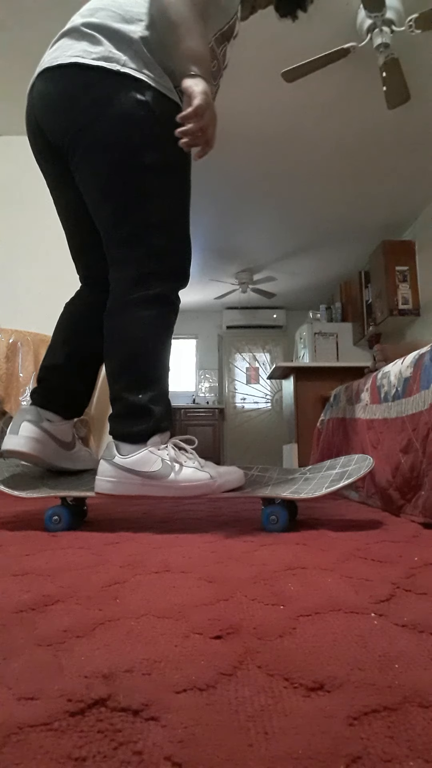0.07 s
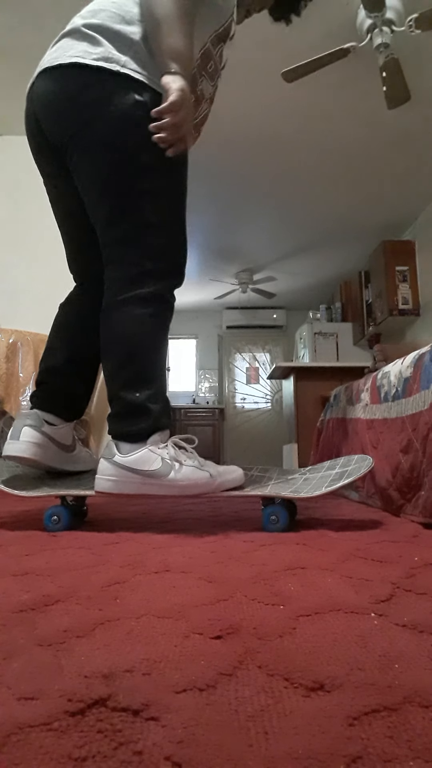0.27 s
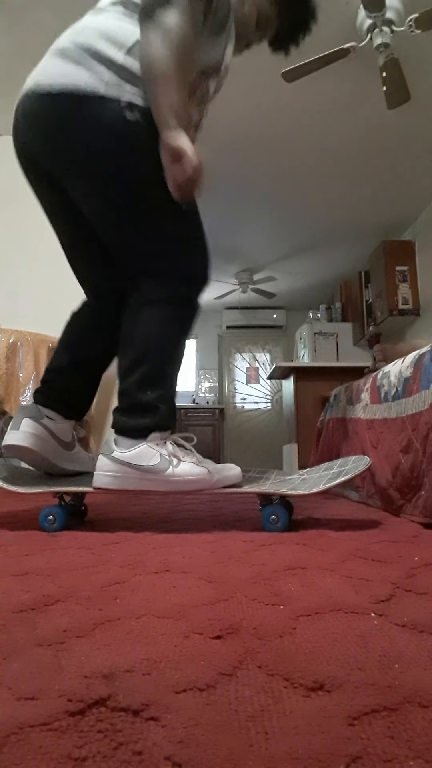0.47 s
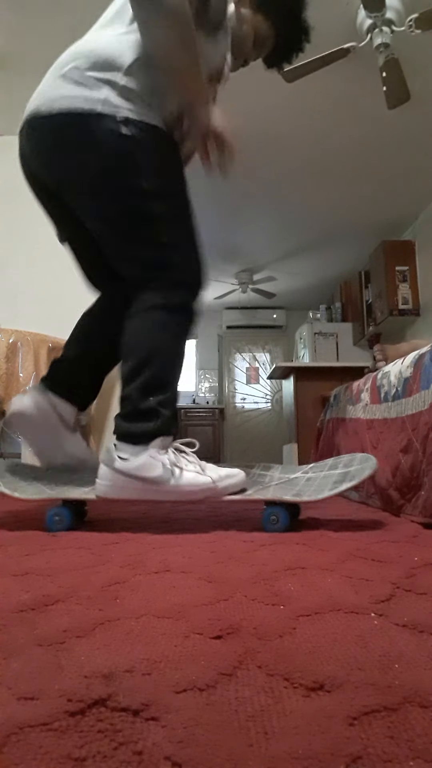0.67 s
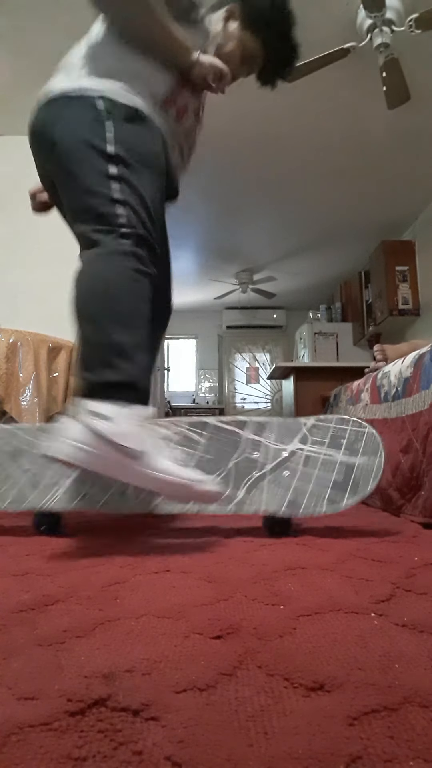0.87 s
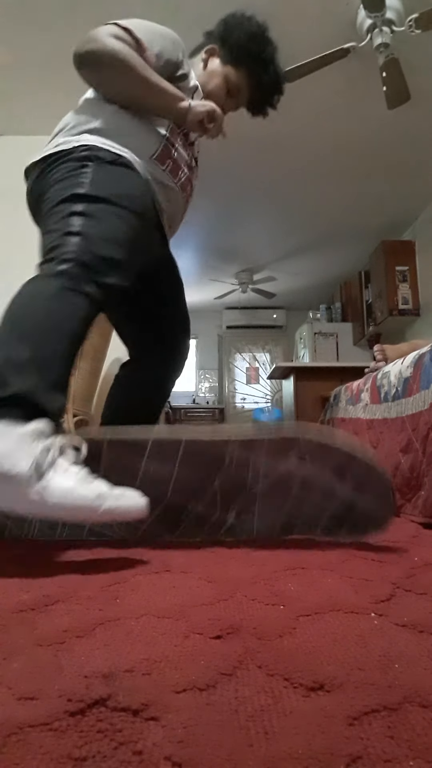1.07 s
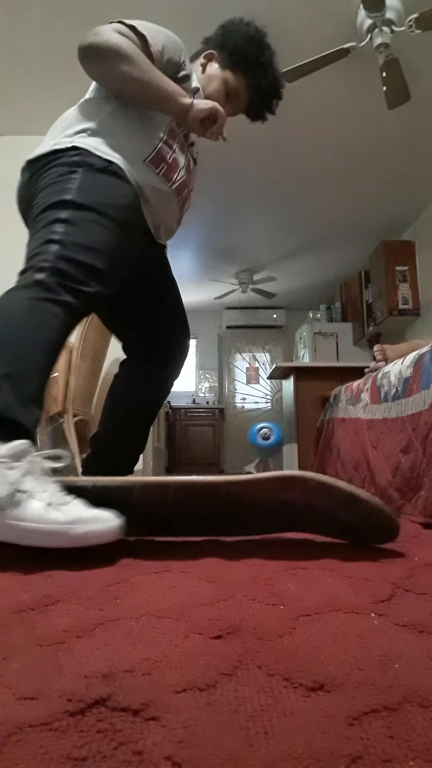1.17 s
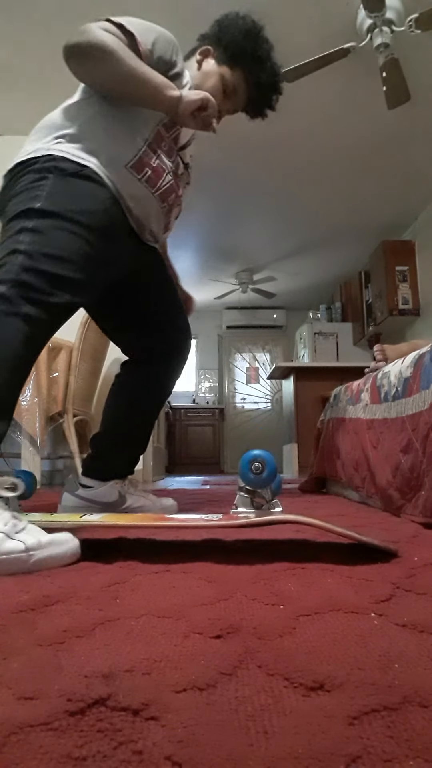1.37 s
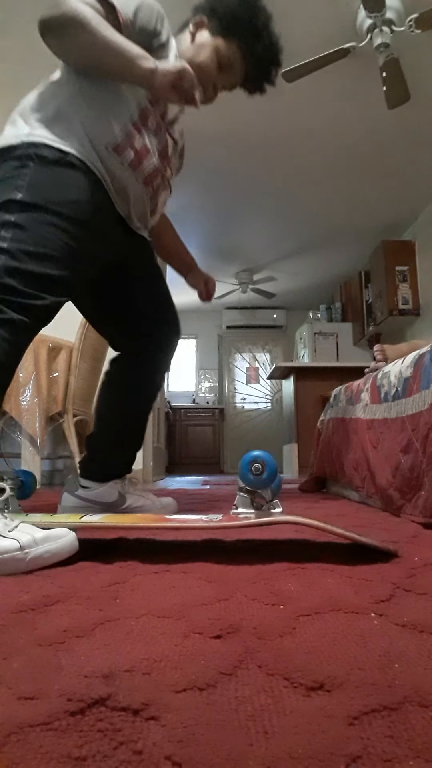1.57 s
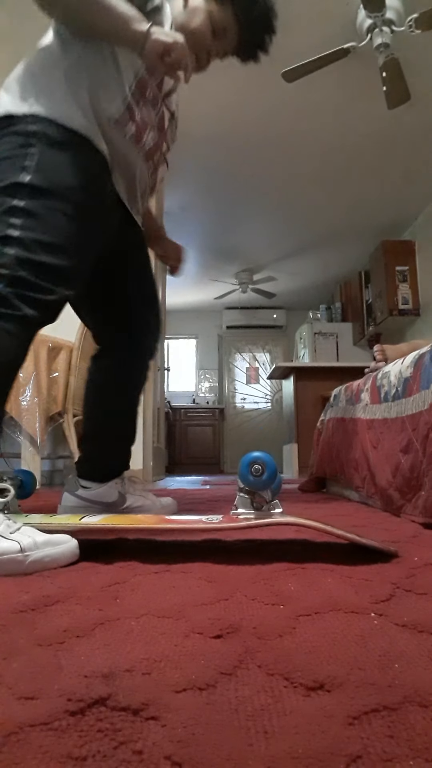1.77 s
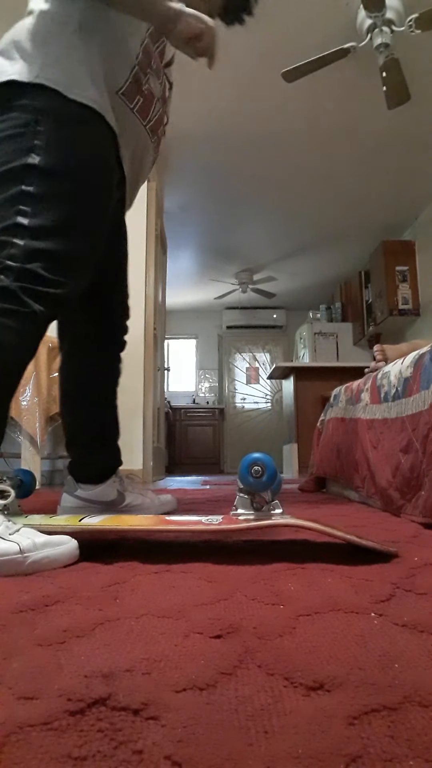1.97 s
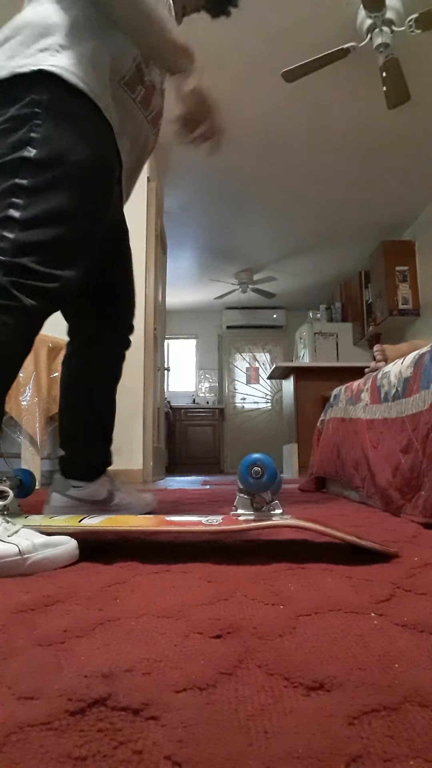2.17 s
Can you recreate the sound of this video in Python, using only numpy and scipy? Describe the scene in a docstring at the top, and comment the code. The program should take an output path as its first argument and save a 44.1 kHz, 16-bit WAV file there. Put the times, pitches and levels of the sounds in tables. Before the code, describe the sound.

Skateboard deck knocks hard on its edge, then tumbles over and rattles onto carpet, after a short scrape and floor thud; clothes rustle afterwards in a small furnished room with faint hum, phone microphone near.

```python
"""A skateboard on carpet in a small furnished room, a metre from a phone microphone on the floor.
Cloth rustles (shaped noise) over soft room noise and a beating appliance hum (two sines). Axles and wheels tick,
a shoe scrapes off the grip tape (dense grit clicks), a foot stamps and the floorboards boom (struck modes).
The wooden deck hits on its edge, flips and lands top down with a rattle and a slide (ringing modes and cracks).
The clothes rustle on and a shoe brushes softly away. A decaying noise tail is the room's answer."""
import sys
import numpy as np
from scipy import signal
from scipy.fft import rfft, irfft
from scipy.io import wavfile
from scipy.ndimage import uniform_filter1d

SR = 44100
rng = np.random.default_rng(int(sys.argv[2]) if len(sys.argv) > 2 else 0)


def persist_wave(psi):
    """Save psi, clipped to +-1, as 16-bit WAV."""
    counts = np.round(np.clip(psi, -1, 1) * 32767).astype(np.int16)
    wavfile.write(sys.argv[1], SR, np.atleast_2d(counts).T)


N = 97020
T = np.arange(N) / SR


def undb(db):
    """Decibels to an amplitude factor."""
    return 10 ** (np.asarray(db) / 20)


def unit(x):
    """Scale to an RMS of 1."""
    return x / np.sqrt(np.mean(x ** 2))


def at(table, x, col=1):
    """Straight lines between the rows of a table, whose first column is the x axis."""
    rows = np.array(table, float)
    return np.interp(x, rows[:, 0], rows[:, col])


def colour(x, table):
    """Causal minimum-phase filter through points of frequency_hz, gain_db."""
    points = np.array(table, float)
    hz = np.maximum(np.arange(2049) * SR / 4096, 1)
    gain_db = np.interp(np.log(hz), np.log(points[:, 0]), points[:, 1])
    cepstrum = irfft(gain_db * np.log(10) / 20)
    # folding the cepstrum forward gives the minimum phase
    cepstrum[1:2048] *= 2
    cepstrum[2049:] = 0
    impulse = irfft(np.exp(rfft(cepstrum)))
    return signal.fftconvolve(x, impulse)[:len(x)]


def walk(rate):
    """Random levels held for 1 / rate seconds and smoothed, with an RMS of 1."""
    hold = max(int(SR / rate), 1)
    steps = rng.standard_normal(N)[np.arange(N) // hold]
    return unit(uniform_filter1d(uniform_filter1d(steps, hold), hold))


def ring(t, hz, t60):
    """A mode struck at t = 0: a sine that falls 60 dB in t60 seconds."""
    t = np.maximum(t, 0)
    return np.sin(2 * np.pi * hz * t) * np.exp(-np.log(1000) * t / t60)


def push(x, ms):
    """A soft contact spreads the blow over a half sine of ms, which dulls it."""
    samples = max(ms, .05) * SR / 1000
    force = np.sin(np.pi * np.clip((np.arange(600) + .5) / samples, 0, 1))
    return signal.fftconvolve(x, force / force.sum())[:N]


def octave_bands(noise, octaves):
    """Split noise into overlapping triangular bands centred on 2 ** octave Hz."""
    n = len(noise)
    spectrum = rfft(noise)
    pitch = np.log2(np.maximum(np.arange(n // 2 + 1) * SR / n, 1))
    return [irfft(spectrum * np.clip(1 - abs(pitch - o), 0, 1), n) for o in octaves]


def room_noise():
    """Soft room noise whose octave bands flicker independently."""
    # colour of the room: frequency_hz, density_db (per Hz)
    room_colour = [(25, -34), (84, -27.5), (110, -17.5), (190, -12), (394, -19), (600, -20.5), (800, -25),
                   (1800, -51), (3300, -45.5), (5000, -35.5), (6500, -30.5), (8100, -53), (16000, -50)]
    level_db, flicker_db, flickers_per_s = -58.5, 1.3, 5.9
    bands = octave_bands(colour(rng.standard_normal(N), room_colour), np.arange(4, 15))
    noise = sum(band * undb(flicker_db * walk(flickers_per_s)) for band in bands)
    return unit(noise) * undb(level_db)


def appliance_hum():
    """Two close sines beat; their shared phase drifts and their level wavers."""
    hum_hz, beat_hz, loudest_s = 118.0, 1.9, 0.33
    level_db, second_db = -58.5, -5.5  # RMS of the lower sine; the upper one relative to it
    waver_db, drift_rad = 1.5, .3
    phase = 2 * np.pi * hum_hz * T + drift_rad * walk(13)
    second = np.sin(phase + 2 * np.pi * beat_hz * (T - loudest_s))
    level = undb(level_db + waver_db * walk(13.65)) * np.sqrt(2)  # RMS to peak
    return (np.sin(phase) + undb(second_db) * second) * level


def rustle():
    """Clothes rustle: shaped noise with a restless level."""
    # level of the clothes' rustle, which carries on under the board's noise: time_s, level_db
    cloth_level = [
        [(0, -57.5), (.06, -61.5), (.2, -71.5), (.57, -71.5), (.63, -66), (.76, -58)],
        [(1.45, -56), (1.6, -64.5), (1.85, -68.5), (2.2, -64.5)],
    ]
    # colour of cloth: frequency_hz, density_db (per Hz)
    cloth_colour = [(400, 1.5), (1000, -5), (2000, -8.5), (4000, -11), (7000, -9.5), (12000, -32.5)]
    cloth = unit(colour(rng.standard_normal(N), cloth_colour))
    return cloth * undb(at(sum(cloth_level, []), T) + walk(29.6))


def shoe_brush():
    """A shoe brushes softly over the pile: a narrower band of noise that swells and fades."""
    # the brush: time_s, level_db
    swell = [(1.96, -89), (1.985, -66.5), (2.05, -59), (2.14, -66.5), (2.17, -76)]
    # colour of the brush: frequency_hz, density_db (per Hz)
    brush_colour = [(1000, -31), (1800, -17), (2300, -5), (3000, -5.5), (3500, 0), (4400, -5), (5000, -18),
                    (8000, -15.5)]
    noise = unit(colour(rng.standard_normal(N), brush_colour))
    return noise * undb(at(swell, T) + 0.87 * walk(59.6))


def thumps():
    """Weight shakes the floorboards, which boom in one low mode."""
    # shakes of the floor: start_s, level_db
    shakes = [(0.961, -37), (0.996, -37.5), (1.073, -57), (1.107, -34), (1.141, -50), (1.235, -43),
              (1.348, -51)]
    boards_hz, boards_t60_s, contact_ms = 79, 0.26, 4.9
    booms = sum(undb(db) * ring(T - s, boards_hz, boards_t60_s) for s, db in shakes)
    return push(booms, contact_ms)


def stamp():
    """A foot lands on the carpet and rings the dull modes of sole and floor."""
    # contacts of the foot: start_s, level_db
    contacts = [(0.9475, -23.5), (0.9587, -30.5), (0.9639, -28.5), (0.971, -37), (0.987, -34.5),
                (1.011, -42)]
    # modes of sole and floor: pitch_hz, level_db, t60_s
    sole = [(127, -14.5, 0.13), (205, -24, 0.12), (341, -11.5, 0.1), (468, -0.5, 0.023), (560, -20, 0.029)]
    contact_ms = 0.67
    thuds = sum(undb(db + mode_db) * ring(T - s, hz, t60)
                for s, db in contacts for hz, mode_db, t60 in sole)
    return push(thuds, contact_ms)


def ticks():
    """Axles and wheels tick: short modes that swell over a moment."""
    # ticks: start_s, level_db, pitch_hz, t60_s
    small_ticks = [(0.772, -44, 4680, 0.011), (0.781, -32, 1370, 0.01), (0.794, -38.5, 1810, 0.019),
                   (0.792, -33, 4300, 0.0068), (.875, -23, 2140, 0.0087), (1.0118, -25.5, 1440, 0.012),
                   (1.016, -37, 1390, 0.014), (0.941, -34, 1460, 0.018), (0.991, -42.5, 1330, 0.031),
                   (1.068, -23, 1270, 0.0094), (1.078, -18.5, 1780, 0.012), (1.242, -27.5, 1854, 0.024),
                   (1.267, -26, 1518, 0.03), (1.237, -27.5, 1550, .03), (1.297, -34.5, 1550, 0.024),
                   (1.34, -32.5, 1500, 0.013), (1.267, -19, 3320, 0.0059), (1.2525, -17, 15000, 0.0043),
                   (1.3075, -22, 15000, 0.0047), (1.438, -19.5, 7270, 0.0018), (1.438, -24.5, 9200, 0.0022),
                   (1.438, -28, 12300, 0.0025), (1.438, -29, 15300, 0.0025), (1.7425, -41, 2640, 0.0015),
                   (1.7425, -41, 3800, 0.0023), (2.07, -36.5, 6100, 0.0028)]
    longest_rise_s = 0.0013
    out = 0
    for start, db, hz, t60 in small_ticks:
        swell = np.clip((T - start) / min(longest_rise_s, t60 / 4), 0, 1)
        out = out + undb(db) * ring(T - start, hz, t60) * swell
    return out


def scrape():
    """Grip tape rubs on sole and carpet, and the bearings rattle after the first landing: dense uneven clicks
    that judder and ring deck and axles."""
    # three rubs, the second being the bearings' rattle: time_s, level_db, treble_db, top_octave_db (the last
    # two relative to the middle)
    rubs = [
        [(.73, -82, -4, -2), (.77, -51.5, -1.5, -7), (.795, -50, -11.5, -6), (.826, -55, -2, -2),
         (.86, -46, -3, -2), (.88, -44.5, -2.5, 1.5), (.893, -41, 0.5, -2), (.903, -37.5, 6, 3),
         (.925, -43, 3.5, 3), (.96, -57.5, 8, -6), (1.05, -57.5, -16, -6)],
        [(1.065, -39.5, -5.5, -13), (1.085, -46, -3, 3), (1.11, -46, -2.7, 1), (1.16, -68, -3, 3)],
        [(1.216, -48, -2, -7), (1.225, -42.5, 10.5, 2), (1.234, -42, -1.5, -4), (1.245, -40.5, 3.5, 2),
         (1.257, -39.5, -1, 0.5), (1.263, -43, -6.5, 6.5), (1.3, -46, -1.5, 0), (1.42, -69.5, 2, 8)],
    ]
    # colours of middle, treble and top octave: frequency_hz, density_db (per Hz)
    mid_colour, treble_colour, air_colour = [(80, -35), (250, 5.5), (700, -1.5), (1500, 4), (2300, 4),
                                             (3500, -5.5), (6000, -28.5)], [(600, -60), (2000, -43), (3000, -0.5),
                                                                 (4500, 0), (6200, 6.5), (8000, 0.5),
                                                                 (10000, -32.5)], [(6000, -46),
                                                                                     (9000, -1.5),
                                                                                     (13000, 1.5),
                                                                                     (16000, -3)]
    # modes of the rubbed deck and axles: pitch_hz, level_db, t60_s
    rubbed_modes = [(1553, -26, 0.09), (2158, -2.5, 0.032), (2920, -5.5, 0.019), (3960, -15, 0.034),
                    (4840, 0, 0.0076), (5130, -2, 0.0057), (5550, -23, 0.067)]
    level_db, rubbed_db = -1, -24.5
    grit_per_s, grit_db = 11000, 2  # grit_db is the mean of an exponential spread of sizes
    judder_db, judder_per_s = 0.5, 150
    chance, size = rng.random((N, 2)).T
    clicks = (chance < grit_per_s / SR) * rng.standard_normal(N) * undb(-grit_db * np.log(1 - size))
    rings = 0
    for hz, db, t60 in rubbed_modes:
        mode = signal.fftconvolve(clicks, ring(T[:SR // 10], hz, t60))[:N]
        rings = rings + undb(db) * unit(mode)
    grit = unit(clicks) + undb(rubbed_db) * rings
    mid, treble, air = (unit(colour(grit, c)) for c in (mid_colour, treble_colour, air_colour))
    # silent outside the rubs
    gain = sum(undb(at(rub, T)) * (T > rub[0][0]) * (T < rub[-1][0]) for rub in rubs)
    treble_gain, air_gain = (undb(at(sum(rubs, []), T, col=c)) for c in (2, 3))
    judder = undb(level_db + judder_db * walk(judder_per_s))
    return judder * gain * (mid + treble_gain * treble + air_gain * air)


def deck():
    """Each blow rings the wooden modes by its place, with a crack, until the carpet mutes the modes."""
    # blows: start_s, level_db, contact_ms, place (0-1 along the deck),
    # crack_db (relative to the blow), bend_db (bending mode, relative to the blow)
    blows = [(1.0657, -26, 0.48, 0.5, -8, -45), (1.069, -22, 0.45, 0.31, -13, -37),
             (1.0718, -18.5, 0.49, 0.079, -31, -6), (1.0777, -19.5, 0.81, 0.18, -19, -36),
             (1.097, -27, 0.57, 0.069, -13.5, -38), (1.219, -26.5, 0.16, 0.37, -8, -33),
             (1.2235, -21.5, 0.47, 0.27, -15.5, -7.5), (1.232, -25, 0.74, 0.32, -17, -24),
             (1.241, -33, 0.34, 0.38, -7, -28), (1.256, -23.5, 0.5, 0.315, -13, -22),
             (1.2667, -25, 0.3, 0.624, -5, -0.5), (1.272, -43, 1, 0.4, -20, -4),
             (1.284, -28, 0.27, 0.318, -9.5, -37), (1.292, -30, 0.42, 0.26, -25, -24),
             (1.3, -36.5, 0.16, 0.405, -11, -23), (1.311, -28, 0.47, 0.21, -8, -24),
             (1.322, -42, 0.44, 0.27, -1, -22), (1.339, -31, 0.31, 0.305, -16, -33),
             (1.356, -33.5, 0.31, 0.17, -8, -35), (1.365, -33, 0.78, 0.16, -14, -44),
             (1.379, -44.5, 0.47, .28, -7, -17)]
    # modes of the deck: pitch_hz, level_db, t60_s
    deck_modes = [(177.4, -15.5, 0.122), (227.4, -13, 0.058), (492.6, -18, 0.18), (527, -9.5, 0.058),
                  (708, -16, 0.15), (780, -7.5, 0.017), (860, -9.5, 0.054), (1084, -25.5, 0.07),
                  (1313, -16, 0.094), (1500, -15.5, 0.057), (1694, -12, 0.07), (1870, -17, 0.083),
                  (2380, -33, 0.033), (2560, -40, 0.039), (3900, -15, 0.029)]
    # colour of the crack: frequency_hz, density_db (per Hz)
    crack_colour = [(150, -5), (400, 8), (750, 8.5), (1500, 5.5), (3000, -11.5), (6000, -21), (12000, -17)]
    # moments when the deck presses into the pile: time_s
    settles = (1.135, 1.245, 1.3, 1.33, 1.355, 1.39)
    bend_hz, bend_t60_s, carpet_t60_s = 316, .21, 0.063
    crack_ms = 3.5  # time constant
    detune = .012  # spread of each mode's pitch from blow to blow, as a share
    noise = unit(colour(rng.standard_normal(N), crack_colour))
    shifts = rng.standard_normal((len(blows), len(deck_modes)))  # the deck rests differently at every blow
    out = 0
    for (start, db, contact_ms, place, crack_db, bend_db), shift in zip(blows, shifts):
        t = T - start
        modes = undb(bend_db) * ring(t, bend_hz, bend_t60_s)
        for k, (hz, mode_db, t60) in enumerate(deck_modes):
            excitation = np.cos(np.pi * (k + 1) * place)  # mode shape at the struck place
            modes = modes + undb(mode_db) * excitation * ring(t, hz * (1 + detune * shift[k]), t60)
        rest = min([r for r in settles if r > start] + [T[-1]])
        mute = np.exp(-np.log(1000) * np.maximum(T - rest, 0) / carpet_t60_s)
        crack = noise * np.exp(-np.maximum(t, 0) * 1000 / crack_ms) * (t >= 0)
        out = out + undb(db) * (push(modes * mute, contact_ms) + undb(crack_db) * crack)
    return out


def echo(x):
    """The small room answers: a noise tail whose octave bands die at their own rates."""
    # decay of the room: frequency_hz, t60_s
    decay = [(150, 0.62), (400, 0.39), (1000, 0.34), (2500, 0.32), (6000, 0.43), (12000, 0.48)]
    level_db, rise_ms = -3.5, 4
    t = T[:SR // 2 + SR // 4]
    octaves = np.arange(5, 15)
    bands = octave_bands(rng.standard_normal(len(t)), octaves)
    tail = sum(band * undb(-60 * t / at(decay, 2. ** o)) for band, o in zip(bands, octaves))
    tail = tail * np.clip(t * 1000 / rise_ms, 0, 1)
    return signal.fftconvolve(x, tail / np.sqrt(np.sum(tail ** 2)))[:N] * undb(level_db)


def scene():
    """The near sources and their echo pass the microphone's colour; room noise and hum join as heard."""
    # colour of the echo: frequency_hz, gain_db
    echo_colour = [(100, -17), (400, -7.5), (1000, 1), (2500, -3), (7000, -2), (14000, -3)]
    # response of the phone's microphone: frequency_hz, gain_db
    microphone = [(40, -28), (62, -12.5), (80, -2.5), (200, 0.5), (4000, 4), (6500, -0.5), (7400, -4),
                  (8200, -11.5), (9300, -24), (12000, -16.5), (16000, -16.5)]
    tick_echo_db = -10.5  # ticks feed the echo more weakly
    near = deck() + scrape() + stamp()
    small = ticks()
    wet = echo(colour(near + undb(tick_echo_db) * small, echo_colour))
    heard = colour(near + small + wet + thumps() + rustle() + shoe_brush(), microphone)
    return np.array([heard + room_noise() + appliance_hum()])


def record(dry):
    """The phone cuts the top with a steep elliptic low-pass."""
    top_hz = 15950
    return signal.sosfilt(signal.ellip(10, .2, 60, top_hz, fs=SR, output="sos"), dry)


dry = scene()
out = record(dry)
persist_wave(out)
```